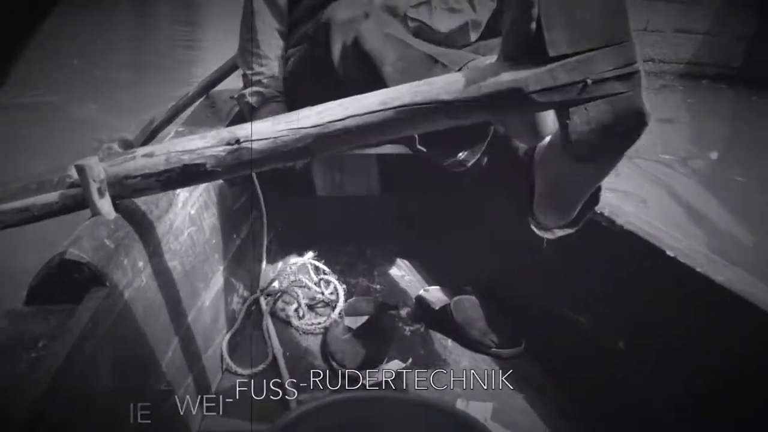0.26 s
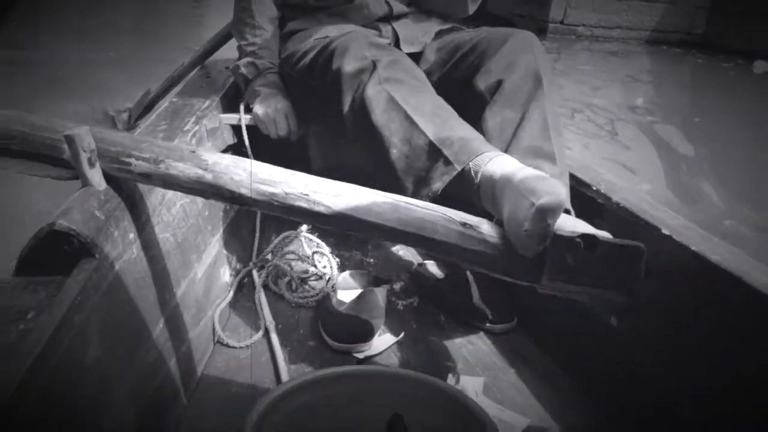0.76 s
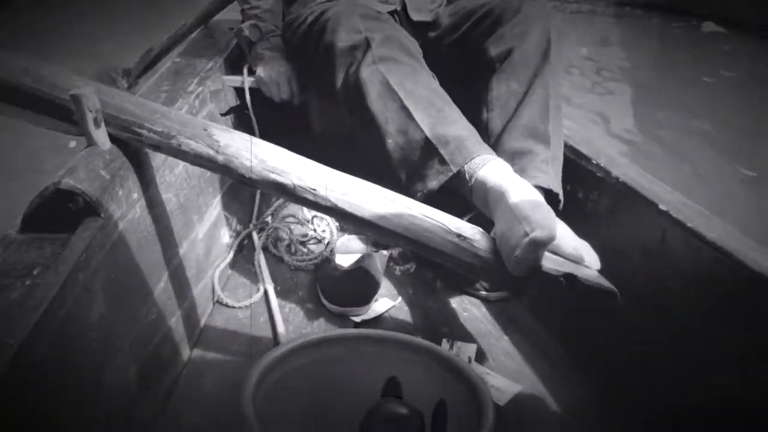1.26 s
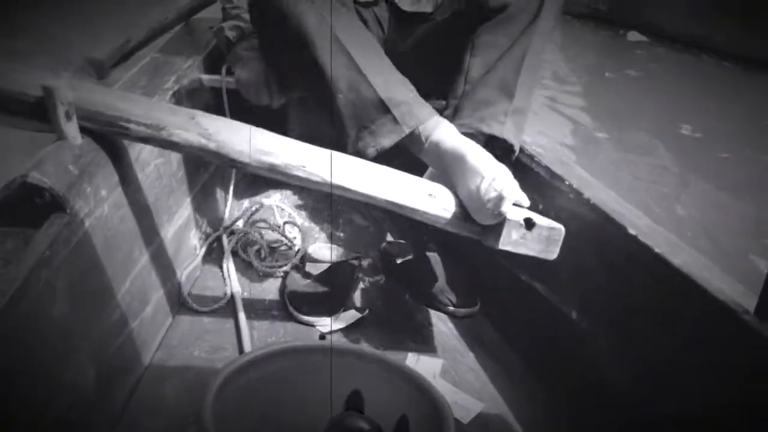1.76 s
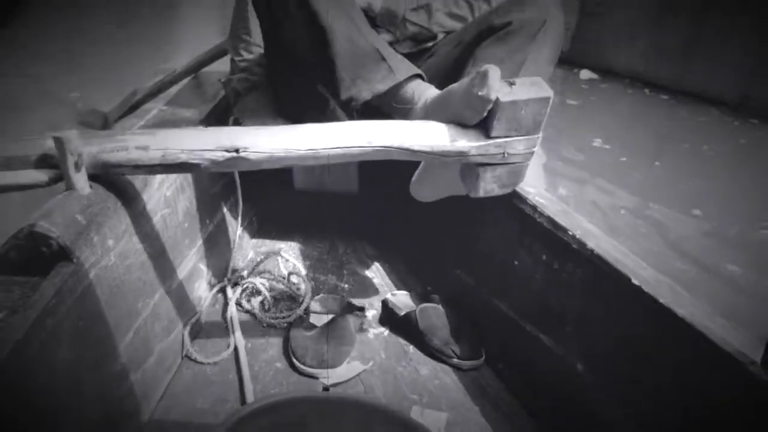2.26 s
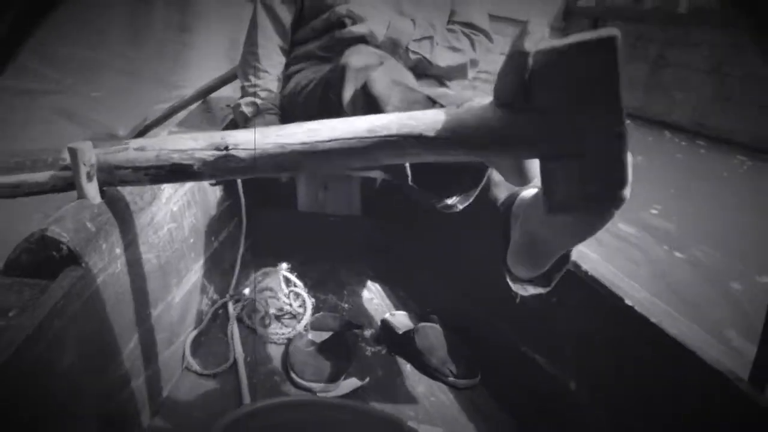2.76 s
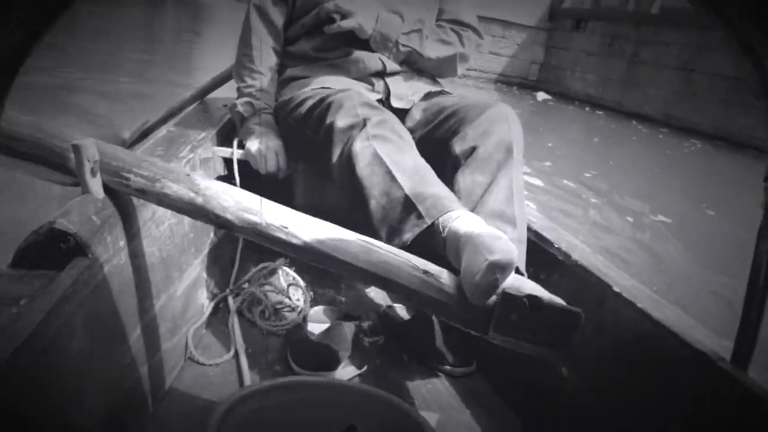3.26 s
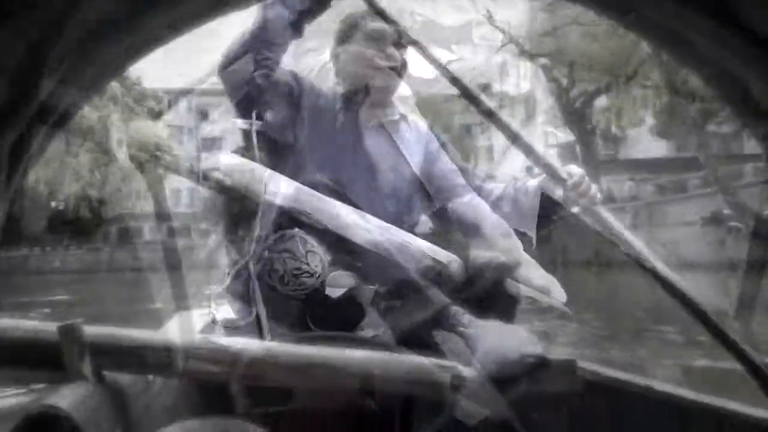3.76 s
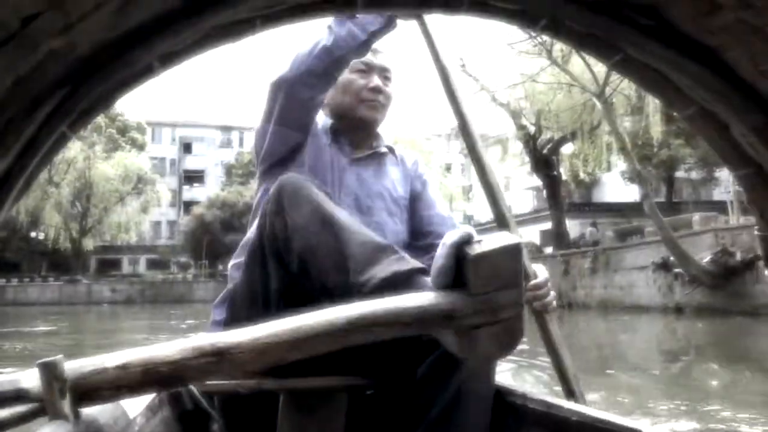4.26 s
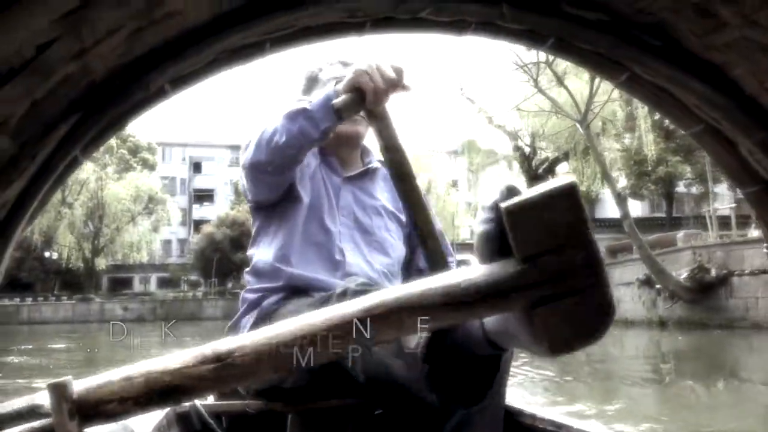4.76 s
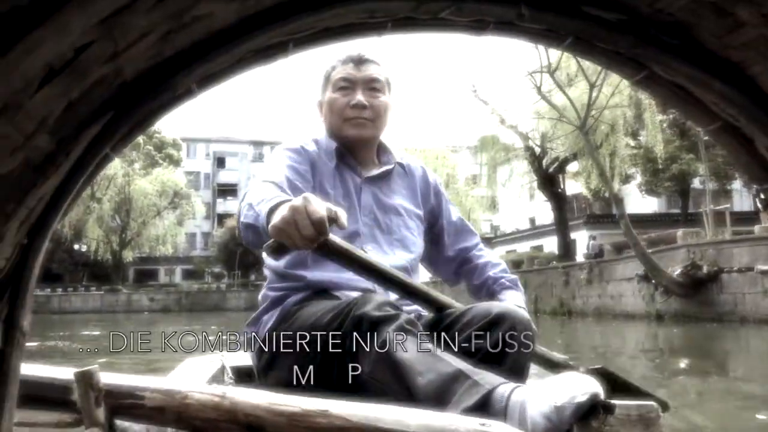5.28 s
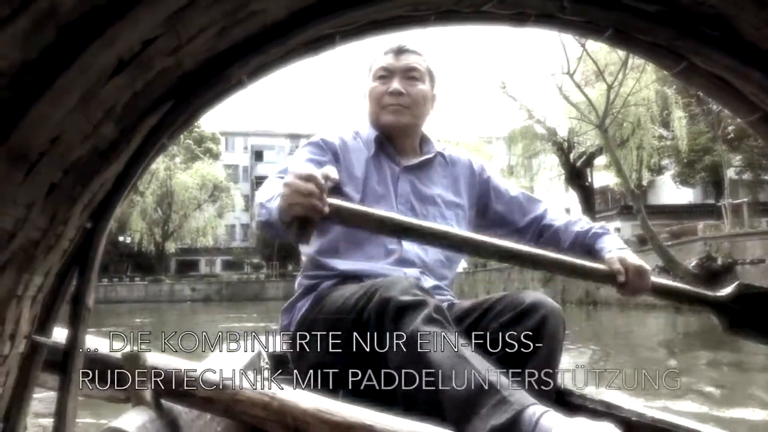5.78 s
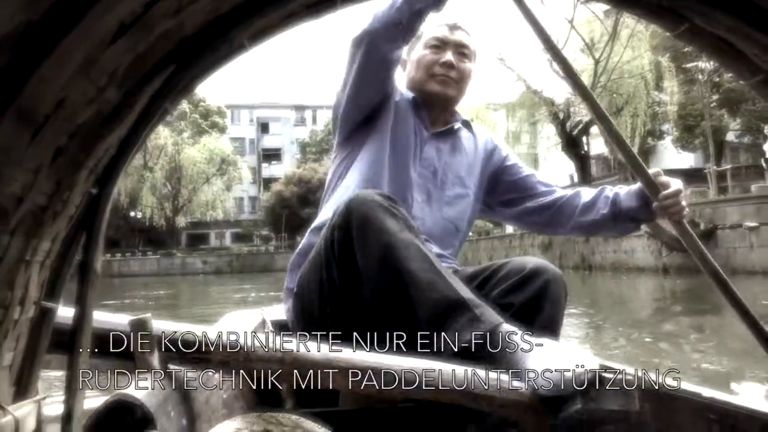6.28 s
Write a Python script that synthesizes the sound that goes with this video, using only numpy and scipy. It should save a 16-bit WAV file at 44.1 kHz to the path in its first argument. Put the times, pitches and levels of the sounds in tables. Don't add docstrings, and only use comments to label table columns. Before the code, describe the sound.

Close inside a small wooden boat on a canal, a soft knock leads straight into a harsh, sagging oar squeal that overloads the microphone. Sharp slaps and a heavy hull thump follow over hollow lapping, then a second shorter squeal. After the microphone shifts under the canopy, rope ticks on the right, drips, splashes, a falling gulp and wet cloth rubs finish it.

```python
import sys
import numpy as np
from scipy import signal
from scipy.fft import rfft, irfft, next_fast_len
from scipy.io import wavfile
from scipy.ndimage import uniform_filter1d, minimum_filter1d

SR = 44100
rng = np.random.default_rng(int(sys.argv[2]) if len(sys.argv) > 2 else 0)


def bounce(signal):
    frames = np.transpose(np.atleast_2d(signal))
    limited = np.clip(frames, -1, 1)
    pcm = np.round(limited * 32767).astype(np.int16)
    wavfile.write(sys.argv[1], SR, pcm)


def boost_factor(decibels):
    exponent = np.asarray(decibels, float) / 20
    return 10 ** exponent


N = 287973


def evened(x):
    return x / np.sqrt(np.mean(x ** 2) + 1e-20)


def read(points, hz):
    f, value = np.transpose(points)
    return np.interp(np.log(hz + 1), np.log(f + 1), value)


def add(mix, s, sound):
    part = mix[..., round(s * SR):][..., :sound.shape[-1]]
    part += sound[..., :part.shape[-1]]


def play(make, rows, **settings):
    mix = np.zeros((2, N))
    for row in rows:
        add(mix, *make(*row, **settings))
    return mix


def resonate(x, hz, width_hz):
    turn = np.exp(2j * np.pi * hz * np.arange(x.shape[-1]) / SR)
    r = np.exp(-np.pi * width_hz / SR)
    return 2 * (turn * signal.lfilter([1 - r], [1, -r], x / turn)).real


def ring(x, hz, width_hz):
    return resonate(resonate(x, hz, width_hz), hz, width_hz)


def causal(points, size=4096):
    hz = abs(np.fft.fftfreq(size, 1 / SR))
    log_gain = np.log(boost_factor(np.maximum(read(points, hz), -100)))
    return np.fft.ifft(np.exp(log_gain - 1j * signal.hilbert(log_gain).imag)).real[:size // 2]


# start t/s, end t/s
MOVE_S = (3.37, 4.26)


def moved_share(t):
    return np.interp(t, MOVE_S, [0, 1])


# t/s, rocking level/dB, stirring level/dB
BOAT_MOTION = [(0.42, -42.5, -46.5), (0.89, -49, -50), (1.05, -42, -49), (1.37, -42.5, -50.5),
               (1.61, -44, -53.5), (1.94, -43.5, -54), (2.14, -36, -53), (2.49, -44, -42),
               (2.9, -35.5, -48), (3.19, -46, -49.5), (3.71, -44, -48.5), (4.06, -37, -50.5),
               (4.41, -36, -43), (4.76, -36, -49), (5.96, -32.5, -51.5), (6.23, -35.5, -47),
               (6.42, -39, -44), (6.53, -30.5, -45.5)]
# rocking level/dB, stirring level/dB
CALM_DB = (-42, -48)
# level in hull/dB, level under canopy/dB, rocking share/1, stirring share/1
WATER_LAYERS = [(-39.5, -40, 0.83, .05), (-38, -39, 0.15, 0.96), (-43.5, -51.5, .02, 1),
                (-56.5, -56.5, .02, 0.71)]


def layer_db(t):
    s, rock_db, stir_db = np.transpose(BOAT_MOTION)
    rock = np.interp(t, s, rock_db) - CALM_DB[0]
    stir = np.interp(t, s, stir_db) - CALM_DB[1]
    moved = moved_share(t)
    return [a * (1 - moved) + b * moved + p * rock + q * stir for a, b, p, q in WATER_LAYERS]


# f/Hz, width/Hz, level/dB
HULL_AIR = [(500, 3.8, -52.5), (250, 14.3, -51), (740, 11, -60.5)]


def drone():
    tones = sum(boost_factor(db) * evened(ring(rng.standard_normal(N), hz, width)) for hz, width, db in HULL_AIR)
    return tones * (1 - moved_share(np.arange(N) / SR))


# f/Hz, density/(dB per Hz)
INSIDE_SPECTRUM = [(20, -22.5), (70, 4), (130, 1), (170, -15.5), (260, -9), (400, -3.5), (740, -8.5),
                   (1300, -16), (2300, -25.5), (3000, -31.5), (5000, -34.5), (9000, -43), (16000, -54)]
OUTSIDE_SPECTRUM = [(20, -19), (60, -1.5), (170, -18.5), (250, -8.5), (400, -20.5), (950, -25.5),
                    (1700, -24.5), (2600, -32.5), (3200, -43.5), (6000, -43), (16000, -53.5)]
# f/Hz, width/Hz, level/dB
HOLLOW_MODES = [(233.8, 49.6, 2.5), (497.3, 16.3, 6), (738, 21, 0.5), (871, 22, 0.5)]
# f/Hz, correlation/1
LIKENESS = [(60, 0.97), (150, 0.99), (380, 0.95), (950, 0.96), (2380, 0.68), (5980, 0.082), (15000, 0.049)]
# f/Hz, left-right/dB
LEAN = [(60, -2.5), (180, -2.5), (550, -1), (1650, -3), (4970, 7), (15000, 2.5)]
# t/s, left-right/dB
HISS_PAN = [
    (0.0, -1),
    (3.9, -0.5),
    (5.4, 2),
    (6.53, 9.5),
]


def water(patchy_db=2.5, flicker_db=1.5, hollow_db=9.5):
    frames, hz = N // 128 + 6, np.fft.rfftfreq(1024, 1 / SR)
    t = np.arange(frames) * 128 / SR
    a, b, c, d, patches = rng.standard_normal((frames, 513, 5)).T
    patches = evened(uniform_filter1d(uniform_filter1d(patches, 14, 0), 9, 1))
    flicker = evened(uniform_filter1d(rng.standard_normal(frames), 6))

    hollow = sum(boost_factor(db) ** 2 / (1 + (2 * (hz - f) / max(w, 10)) ** 2) for f, w, db in HOLLOW_MODES)
    moved = moved_share(t)
    colour_db = np.outer(read(INSIDE_SPECTRUM, hz) + hollow_db * hollow, 1 - moved)
    colour_db = colour_db + np.outer(read(OUTSIDE_SPECTRUM, hz), moved)
    bands_hz = [(15, 225), (180, 1410), (1200, 3400), (2800, 48000)]
    power = 0
    for (lo_hz, hi_hz), level_db in zip(bands_hz, layer_db(t)):
        band = 1 / (1 + (lo_hz / (hz + 1)) ** 6) / (1 + (hz / hi_hz) ** 6)
        layer = boost_factor(colour_db) ** 2 * band[:, None]
        power = power + layer / layer.sum(0) * boost_factor(level_db) ** 2

    same = np.clip(read(LIKENESS, hz), -1, 1)[:, None]
    left = a + 1j * b
    right = same * left + np.sqrt(1 - same ** 2) * (c + 1j * d)
    change_db = patchy_db * np.clip(hz / 900, .3, 1)[:, None] * patches
    change_db = change_db + flicker_db * np.outer(np.minimum(hz / 3000, 1), flicker)
    z = np.array([left, right]) * np.sqrt(power) * boost_factor(change_db)
    pan_db = np.outer(hz > 3500, np.interp(t, *np.transpose(HISS_PAN)))
    pan_db = pan_db + (read(LEAN, hz) * (hz <= 3500))[:, None]
    z *= boost_factor(np.array([pan_db, -pan_db]) / 2)
    return 1.2 * signal.istft(z, nperseg=1024, noverlap=896)[1][:, :N]


def droplets(low_hz, layer, per_s, db, tilt, flurries=(), spread_db=4.5):
    out, t = np.zeros((2, N)), np.arange(900) / SR
    now = np.arange(N) / SR
    flurry_db = sum(g * np.exp(-((now - s) / w) ** 2) for s, w, g in flurries)
    stir = boost_factor(layer_db(now)[layer] + 57.0) * boost_factor(flurry_db)
    for hz, cycles, side in rng.random((24, 3)):
        hz = low_hz * 3.6 ** hz
        blip = np.sin(2 * np.pi * hz * t * (1 + 8 * t)) * np.exp(-t * hz / (0.5 + 8 * cycles))
        blip = blip * (1000 / hz) ** tilt
        train = (rng.random(N) < per_s / 24 / SR) * boost_factor(spread_db * np.minimum(rng.exponential(1, N), 3))
        out += signal.oaconvolve(train, blip)[:N] * np.array([[.7 + .6 * side], [1.3 - .6 * side]])
    return boost_factor(db) * stir * out


# t/s, half length/s, level/dB
PIP_FLURRIES = [
    (.75, .2, 4),
    (5.06, .06, 1),
    (5.45, .22, 5),
    (6.38, .14, 13),
]


def spray_drops():
    large = droplets(900, 2, per_s=140, db=-58, tilt=0.9)
    return large + droplets(4000, 3, per_s=120, db=-64, tilt=0, flurries=PIP_FLURRIES)


def rub(s, length, db, pan_db, peak, colour, crackle, per_s=260, spread_db=2.5):
    t = np.arange(0, length, 1 / SR)
    db = db + np.interp(t / length, [0, np.clip(peak, .05, .95), 1], [-9.5, 0, -11.5])
    snaps = (rng.random(len(t)) < per_s / SR) * boost_factor(spread_db * np.minimum(rng.exponential(1, len(t)), 4))
    grain = 1 + crackle * signal.lfilter([1], [1, -.975], snaps)
    noise = rng.standard_normal((len(t), 2)).T * grain
    scrape = signal.oaconvolve(noise, causal(colour)[None], axes=1)[:, :len(t)]
    pan = boost_factor(np.array([[pan_db], [-pan_db]]) / 2)
    return s, evened(scrape) * boost_factor(db) * pan * signal.windows.tukey(len(t), .1)


# t/s, length/s, level/dB, left-right/dB, peak position/1
SPLASHES = [
    (.56, 0.17, -42.5, .5, 0.66),
    (2.3, 0.2, -52, .5, 0.79),
    (3.901, 0.37, -47.5, -1.5, 0.28),
    (4.33, 0.41, -45.5, -1.4, 0.49),
    (5.0, 0.16, -46.5, -1.5, 0.28),
    (6.24, 0.11, -38, .5, .4),
    (6.45, 0.062, -42.5, .5, 0.59),
]
# f/Hz, density/(dB per Hz)
SPLASH_SPECTRUM = [(300, -28), (700, 0), (1500, 1), (2600, -3.5), (4000, -12), (7000, -34.5), (16000, -43)]


def splashes():
    return play(rub, SPLASHES, colour=SPLASH_SPECTRUM, crackle=3.7, per_s=450)


# t/s, length/s, level/dB, left-right/dB, peak position/1
SLIDES = [
    (1.428, 0.081, -44, 1, 0.33),
    (2.107, 0.12, -40.5, 0, 0.78),
]
# f/Hz, density/(dB per Hz)
SLIDE_SPECTRUM = [(1180, -22.5), (2000, -3), (2960, -11), (3230, -4), (4450, -14), (5110, -16.5),
                  (6930, -22), (7560, -21.5), (11000, -33.5), (13500, -25.5), (16000, -38)]


def sole_slides():
    return play(rub, SLIDES, colour=SLIDE_SPECTRUM, crackle=.15)


# t/s, length/s, level/dB, left-right/dB, peak position/1
RUBS = [(3.961, 0.073, -50.5, 17, 0.45), (5.305, 0.028, -51.5, 5.1, 0.37), (5.369, 0.13, -50.5, 6.6, 0.55),
        (5.48, .11, -53, 9.9, .6), (5.649, 0.065, -58, 4.1, 1), (6.228, 0.07, -46, 11.6, 0.15),
        (6.307, .11, -44.5, 7.3, 0.78), (6.41, 0.039, -38.5, 18.6, 0.27), (6.449, 0.086, -42, 9.2, 1)]
# f/Hz, density/(dB per Hz)
RUB_SPECTRUM = [(880, -39), (1500, -20), (1670, 5.5), (1830, -43), (2020, -2.5), (3150, -5), (4540, -2),
                (5270, -19), (6620, -4.5), (7600, -13), (11800, -8), (16000, -19.5)]


def wet_rubs():
    return play(rub, RUBS, colour=RUB_SPECTRUM, crackle=3.2)


# f/Hz, side-mid/dB
WIDTH = [(60, -21), (130, -15), (290, -16.5), (640, -18.5), (1410, -10), (2200, -6.5), (3100, -5),
         (6820, -1), (15000, -3)]


def boat(x, t60=0.18, wet_db=-21, wide_db=1.0):
    t = np.arange(SR // 4) / SR
    tail, near = rng.standard_normal((len(t), 2)).T
    tail = signal.lfilter([.1], [1, -.88], tail * boost_factor(-60 * t / t60) * (t > .004))
    near = near * boost_factor(-60 * t / 0.0089)
    size = next_fast_len(N + len(t))
    hz = np.fft.rfftfreq(size, 1 / SR)
    scattered = 1 / (1 + (1500 / (hz + 1)) ** 4)
    near = rfft(near, size)
    near = near / np.sqrt(uniform_filter1d(abs(near) ** 2, size=1500))
    near = boost_factor(read(WIDTH, hz)) * (scattered * near + 1j * (1 - scattered))
    mid = x.mean(0)
    side = boost_factor(wide_db) * irfft(rfft(mid, size) * near, size)[:N]
    wet = signal.oaconvolve(mid, tail / np.linalg.norm(tail))[:N]
    return x + boost_factor(wet_db) * wet + side * [[1], [-1]]


def drip(s, db, hz, t60, glide=0.49):
    t = np.arange(SR // 8) / SR
    gliding = np.minimum(t, .03)
    turns = hz * (t + glide * gliding * (2 * t - gliding) / 2)
    return s, boost_factor(db - 60 * t / t60) * np.minimum(t / 0.0065, 1) * np.sin(2 * np.pi * turns)


# t/s, peak level/dB, f/Hz, t60/s
DRIPS = [(0.4409, -42.5, 2430, 0.06), (2.8833, -27.5, 1510, 0.049), (3.1996, -34, 1820, 0.053),
         (4.359, -25.5, 1860, 0.04), (4.563, -31, 1500, .03), (4.601, -40, 2380, .07),
         (3.0375, -29, 1560, 0.045), (3.0769, -30, 1550, 0.056), (4.593, -26, 1430, 0.046),
         (4.7222, -28, 1590, 0.06), (5.0719, -35.5, 1560, 0.1), (4.4243, -32, 1040, 0.14),
         (4.495, -25.5, 1080, 0.09)]
# t/s, peak level/dB, f/Hz, t60/s, glide/(1/s)
PADDLE_TAP = (5.927, -23, 760, .075, -14)


def drips():
    return play(drip, DRIPS + [PADDLE_TAP])


def tick(s, db, hz, treble_db, pan_db, plank_db, t60=0.018, crack=6.0):
    t = np.arange(3000) / SR
    snap = rng.standard_normal(len(t)) * boost_factor(-60 * t / t60) + crack * (t == 0)
    dry_part = ring(snap, hz, 0.22 * hz) + .5 * ring(snap, 0.61 * hz, 1200) + 0.04 * ring(snap, 1.49 * hz, 3130)
    parts = dry_part, ring(snap, 3800, 8400), ring(snap, 500, 350)
    sound = sum(boost_factor(g) * p / abs(p).max() for g, p in zip((0, treble_db, plank_db), parts))
    return s - .0005, boost_factor(db) * sound * boost_factor([[pan_db / 2], [-pan_db / 2]])


# t/s, peak level/dB
ROPE_TICKS = [(3.9157, -27.5), (4.054, -25), (4.1862, -18), (4.2135, -26), (4.2348, -30.5), (4.325, -18.5),
              (4.338, -25.5), (4.4435, -30.5), (4.4837, -23), (4.5635, -40), (4.8595, -29)]


def rope_ticks():
    return play(tick, ROPE_TICKS, hz=1610, treble_db=-27, plank_db=-7.5, pan_db=-11.5)


# t/s, peak level/dB, f/Hz, treble level/dB
BOARD_TICKS = [(0.0294, -29.5, 2400, -15), (3.005, -39.5, 2980, -18), (3.085, -43, 4500, -3),
               (4.301, -41.5, 3860, -25), (4.36, -38, 3470, -25), (4.5915, -43, 3500, -20),
               (5.2021, -38, 2320, -30), (5.2326, -41, 2480, -13), (5.4141, -39, 5400, -12),
               (5.384, -45, 4800, -20), (5.445, -40, 4800, -15), (5.468, -42, 5500, -8),
               (5.541, -42, 6200, -10), (5.53, -38, 2370, -25), (5.699, -39, 2000, -15),
               (0.7608, -40.5, 4270, -14), (0.9784, -27.5, 3300, -14), (3.244, -35, 2530, -35),
               (3.4496, -33, 1950, -37), (3.6417, -33, 1810, 3.5), (3.9455, -23, 1820, -29),
               (4.149, -44.5, 2350, 10), (4.386, -35, 3360, -25), (4.4575, -36.5, 3720, -22),
               (5.036, -35.5, 2660, -30), (5.1527, -37.5, 2500, -35), (5.4316, -33, 1870, -42),
               (5.5571, -35, 3300, -10), (6.4215, -29.5, 4300, -22), (6.188, -41, 3900, -25),
               (6.238, -34, 3900, -20)]


def board_ticks():
    return play(tick, BOARD_TICKS, plank_db=-2, pan_db=0.5)


# t/s, peak level/dB, f/Hz, treble level/dB, left-right/dB
CLACKS = [
    (0.573, -39, 3230, -16, -6),
    (1.183, -16, 2710, -20, -4),
    (1.183, -30, 7200, -23, -6),
    (1.295, -27.5, 2530, -22, 0),
    (2.0028, -31.5, 4040, -21, -0.5),
    (2.5061, -13.5, 2130, -23.5, 0),
    (3.9942, -30.5, 1970, -36, -7),
]


def clacks():
    return play(tick, CLACKS, plank_db=-29)


# t/s, peak level/dB, f/Hz
CLOTH_SNAPS = [(6.377, -41, 12500), (6.397, -41, 12000), (6.409, -41, 8500), (6.454, -36.5, 11500),
               (6.485, -39.5, 12500), (6.496, -38, 11000)]


def cloth_snaps():
    return play(tick, CLOTH_SNAPS, treble_db=-12, plank_db=-40, pan_db=11)


# f/Hz, level/dB, t60/s
THUMP_MODES = [(72.6, -3.5, 0.17), (101.7, -3, 0.26), (136.6, -8, 0.22), (187.4, -12, 0.23),
               (262, -16.5, 0.41)]


def knock(s, db, thump_db, hz, t60, body_db=-8):
    t = np.arange(SR // 4) / SR
    burst = rng.standard_normal(len(t)) * boost_factor(-60 * t / t60) * np.minimum(t / 0.0056, 1)
    body = 0.98 * ring(ring(burst * boost_factor(-60 * t / 0.19), 1170, 2200), 1170, 2200)
    body = body + 0.67 * ring(burst, 510, 198)
    wood = evened(ring(burst, hz, 394)) + boost_factor(body_db) * evened(body)
    boom = sum(boost_factor(g - 60 * t / min(d, .25)) * np.sin(2 * np.pi * f * t) for f, g, d in THUMP_MODES)
    boom = boom * np.minimum(t / 0.019, 1)
    return max(s - .002, 0), boost_factor(db) * (wood / abs(wood).max() + boost_factor(thump_db) * boom / abs(boom).max())


# t/s, peak level/dB, thump level/dB, f/Hz, t60/s
KNOCKS = [(1.993, -11.5, -2.5, 756, 0.12), (5.275, -24.5, 2, 523, 0.26), (5.383, -25, 3, 550, 0.18),
          (6.2205, -24, -11, 650, 0.29), (6.278, -22.5, -14, 1130, 0.15), (6.515, -20, -25, 654, 0.11),
          (2.253, -30, -12, 1790, 0.047), (2.312, -35.5, -27, 1400, 0.14), (2.387, -24.0, -9, 1080, 0.081),
          (.978, -28.5, -3.5, 450, 0.15), (4.41, -37, -15, 1900, 0.18), (4.505, -36, -20, 2000, 0.15),
          (2.2, -28, -20.0, 800, 0.4), (3.043, -27.5, -16, 770, 0.11), (3.953, -24.0, -9, 750, 0.095),
          (3.99, -27.0, -21, 750, 0.093), (4.396, -24.5, -19, 520, 0.13), (5.927, -28.5, -10, 530, 0.06),
          (0.001, -26.5, -3, 280, 0.17)]


def knocks():
    return play(knock, KNOCKS)


PHASE_FORCE_DB = (-4, 4.5, 0, -5, -5.5)
PHASE_SWAY_DB = (-5, 11.5, -11, -11, -4)
# t/s, depth/1
CATCHES = [
    (0.174, 0.7),
    (.2115, 0.95),
    (2.6135, 0.9),
]


def grip(stroke, slip_rate):
    bite, lock, snap, free, grind_rough = stroke
    bite_rough, locked_rough, break_rough = .33, .03, .8
    rise_s, switch_s, settle_s, catch_s = 0.008, 0.00684, .018, .0035
    drop_s, ring_out_s = .013, 0.16
    t = np.arange(bite, free + ring_out_s, 1 / SR)
    at = [bite + rise_s, lock - switch_s, lock + switch_s, snap - switch_s / 2,
          snap + switch_s / 2, snap + 3 * switch_s, free]
    phase = [0, 0, 1, 1, 2, 3, 4]
    falter = sum(depth * np.exp(-((t - s) / catch_s) ** 2) for s, depth in CATCHES)

    force_db = np.interp(t, [bite, *at, free + drop_s, free + ring_out_s],
                         [-24, *np.take(PHASE_FORCE_DB, phase), -30, -54])
    phase_rough = [bite_rough, locked_rough, break_rough, grind_rough, grind_rough]
    rough = np.interp(t, [*at, free + drop_s], [*np.take(phase_rough, phase), 1])
    settling = np.exp(-abs(t - lock - switch_s) / settle_s) * (t > lock)
    settling = settling * np.minimum((t - lock) / switch_s, 1)
    rough = rough + (bite_rough - locked_rough) * settling
    sway_db = np.interp(t, at, np.take(PHASE_SWAY_DB, phase))
    hz = np.interp(t, *np.transpose(slip_rate))
    sway_db = sway_db - 14 * falter - 10 * (hz < 325)
    return t, force_db - 13 * falter, hz, rough + .3 * falter, sway_db


# f/Hz, width/Hz, level/dB
OAR_MODES = [(425, 16, 2.5), (637, 95, -1.5), (872, 55, -12.5), (1056, 44, -2), (1264, 20, -20.5),
             (1520, 26, -24.5), (1570, 9, -6.5), (1900, 156, -10.5), (2130, 160, -10.5), (2610, 34, -28.5),
             (3290, 316, -21), (3880, 49, -45)]
# f/Hz, density/(dB per Hz)
SLIP_SPECTRUM = [(40, -58.5), (110, -11), (300, 13), (700, -15.5), (1400, -9.5), (2200, -8.5), (3000, -17),
                 (5000, -36.5), (7000, -38.5), (10000, -66), (16000, -65.5)]
# f/Hz, width/Hz, level/dB
PLANK_MODES = [(117.6, 19, -12.5), (164.7, 19, -17.5), (266.5, 10.6, -6), (365.7, 22.7, -2), (508, 38, -3),
               (629.3, 36, -2), (692, 40, -9.5), (865, 77, -5.5), (1034, 30, -12.5)]


def squeal(stroke, slip_rate, grit=0.98, modes_db=8.0, second_db=-16, fizz_db=-42, planks_db=12.5):
    t, force_db, hz, rough, sway_db = grip(stroke, slip_rate)
    lock, free = stroke[1], stroke[3]
    rough = np.clip(rough, 0, 1)
    wander, size, scratch = rng.standard_normal((len(t), 3)).T
    jitter = (.004 + .3 * rough ** 2) * evened(uniform_filter1d(wander, 90))
    turns = np.cumsum(hz * (1 + jitter)) / SR
    slips = sum(np.cos(2 * np.pi * k * turns) for k in range(2, 25))
    slips = evened(slips) * boost_factor(5.3 * rough * evened(uniform_filter1d(size, 110)))
    scratch = scratch * (0.29 + np.exp(-(turns % 1) / 0.19))

    drive = (1 - rough * grit) * slips + rough * scratch
    rings = sum((-1) ** k * boost_factor(db) * ring(drive, f, w * 2.94) for k, (f, w, db) in enumerate(OAR_MODES))
    wood = evened(signal.oaconvolve(drive, causal(SLIP_SPECTRUM))[:len(t)] + boost_factor(modes_db) * rings)

    sway = np.cos(2 * np.pi * turns - 1.2) + boost_factor(second_db) * np.cos(4 * np.pi * turns - 1.5)
    slow = uniform_filter1d((hz < 375) * (1 - rough), 200)
    both = wood + boost_factor(sway_db) * sway * np.sqrt(2) + boost_factor(8) * slow * np.cos(6 * np.pi * turns)

    fizz = boost_factor(fizz_db) * (0.23 + rough) * np.interp(t, [lock, free], [.3, 1.7])
    fizz = fizz * ring(scratch, 6300, 16500) * np.clip((force_db + 18.5) / 10, 0, 1)

    grind = evened(signal.lfilter([1], [1, -.9], scratch)) * np.minimum(1.59 * rough, .8) * boost_factor(force_db)
    hull = sum((-1) ** k * boost_factor(db) * resonate(resonate(grind, f, w), f, 6 * w)
               for k, (f, w, db) in enumerate(PLANK_MODES))
    oar = boost_factor(force_db) * (both / np.sqrt(1 + boost_factor(sway_db) ** 2) + fizz)
    return t[0], oar + boost_factor(planks_db) * hull


# bite t/s, lock t/s, break t/s, let-go t/s, grind roughness/1
STROKES = [
    (.137, .151, .293, .332, .78),
    (2.56, 2.604, 2.727, 2.779, .3),
]
# t/s, f/Hz
SLIP_RATES = [
    [(.136, 649), (.15, 552.6), (.17, 521), (.18, 490.5), (.207, 484), (.22, 440.9), (.245, 438.6),
     (.292, 419.1), (.31, 368.6)],
    [(2.559, 651), (2.58, 637), (2.584, 299.5), (2.602, 300.8), (2.606, 514.7), (2.66, 478.3),
     (2.728, 421.7), (2.745, 351.5), (2.79, 359.5)],
]


def squeals():
    return play(squeal, zip(STROKES, SLIP_RATES))


def scene():
    background = drone() + water() + spray_drops()
    feet = splashes() + sole_slides() + wet_rubs()
    ticks = rope_ticks() + board_ticks() + clacks() + cloth_snaps()
    close = drips() + ticks + knocks() + squeals()
    return background + feet + boat(close)


def top_cut(x):
    return signal.sosfilt(signal.butter(12, 16120, fs=SR, output="sos"), x)


def record(dry, hold=150, push_db=1.8):
    dry = signal.lfilter(*signal.butter(1, 22, "high", fs=SR), dry)
    room = minimum_filter1d(1 / np.maximum(abs(dry).max(0), 1), size=round(hold))
    held = dry * uniform_filter1d(room, size=round(hold / 2)) * boost_factor(push_db)
    edged = signal.oaconvolve(held, signal.firwin(255, 16100, fs=SR)[None], "same")
    return top_cut(np.clip(edged, -1, 1))


dry = scene()
out = record(dry)
bounce(out)
```